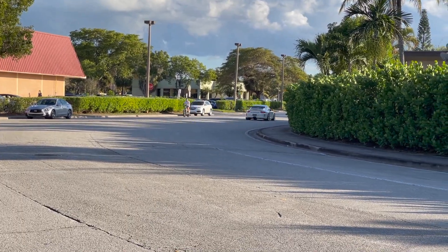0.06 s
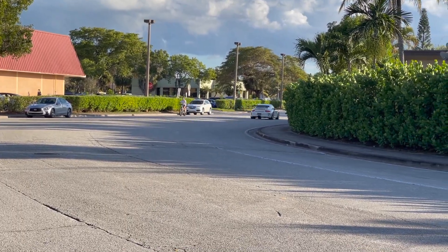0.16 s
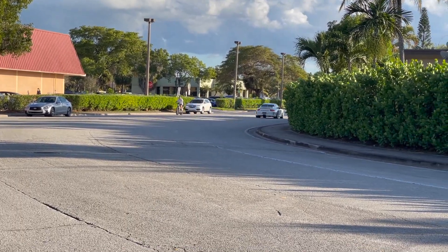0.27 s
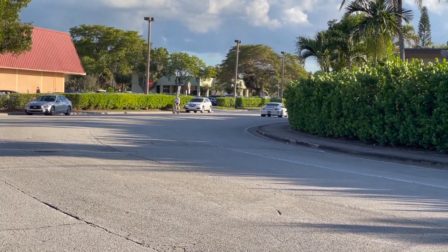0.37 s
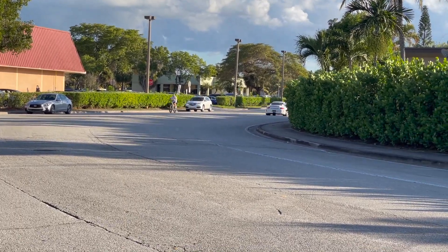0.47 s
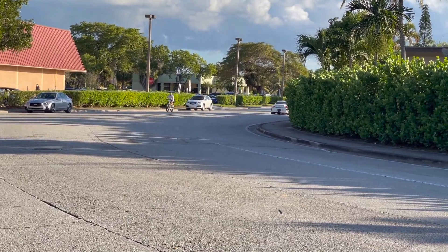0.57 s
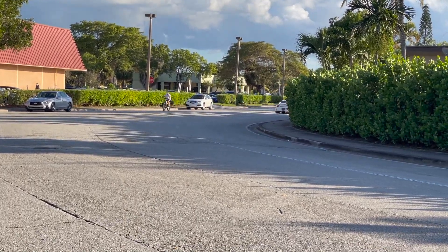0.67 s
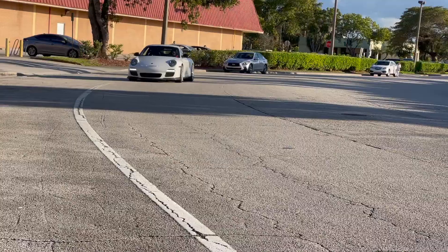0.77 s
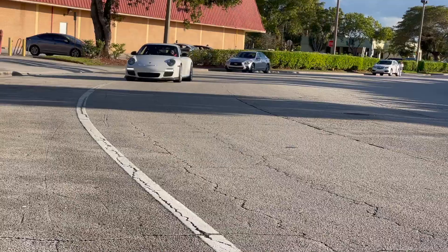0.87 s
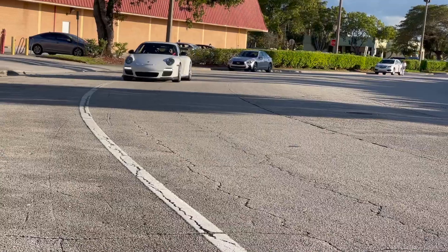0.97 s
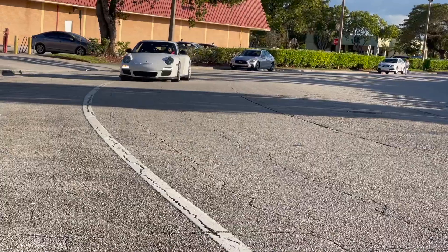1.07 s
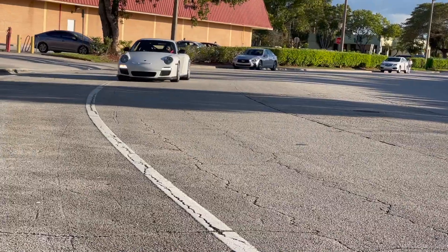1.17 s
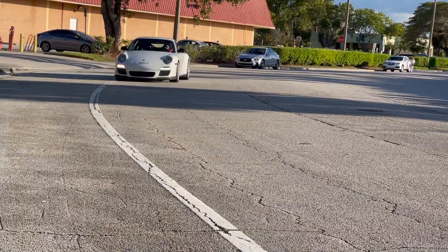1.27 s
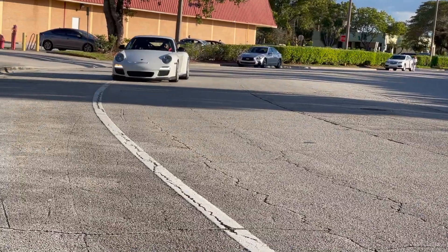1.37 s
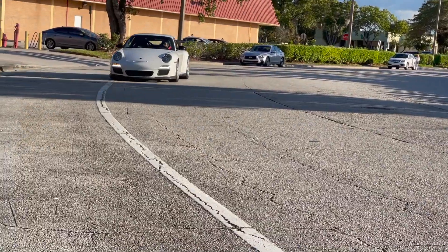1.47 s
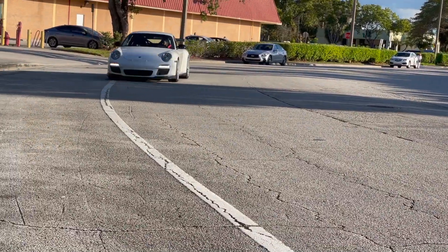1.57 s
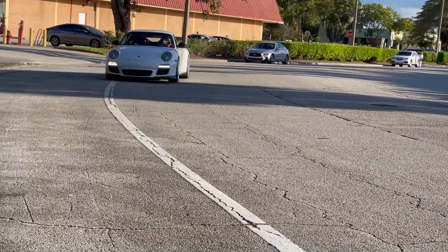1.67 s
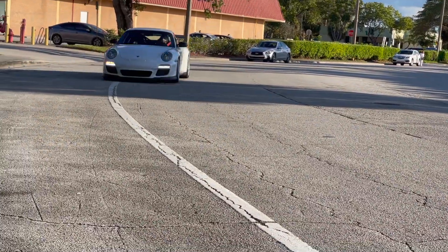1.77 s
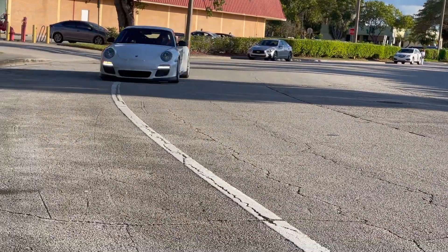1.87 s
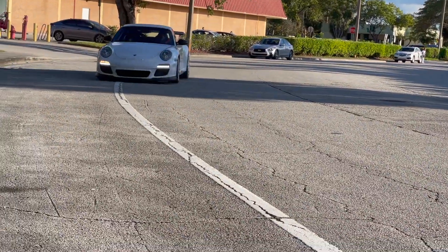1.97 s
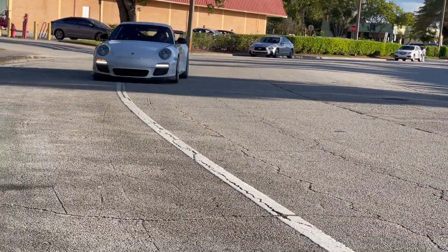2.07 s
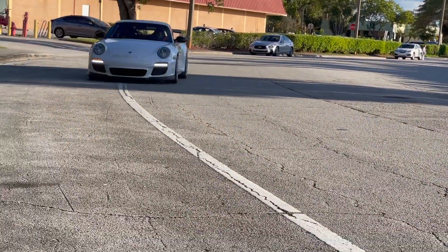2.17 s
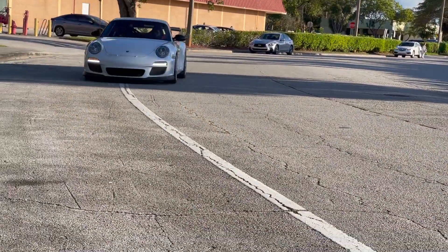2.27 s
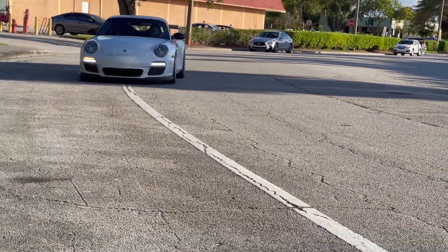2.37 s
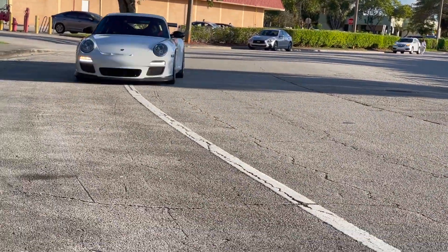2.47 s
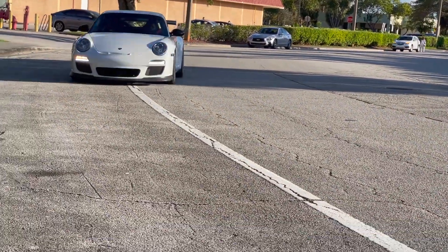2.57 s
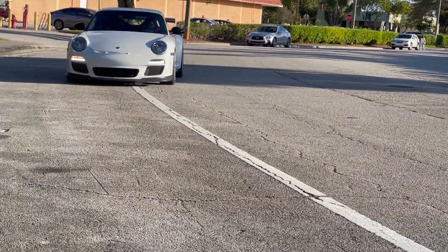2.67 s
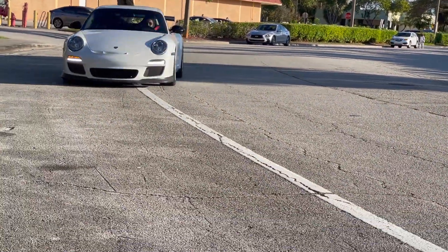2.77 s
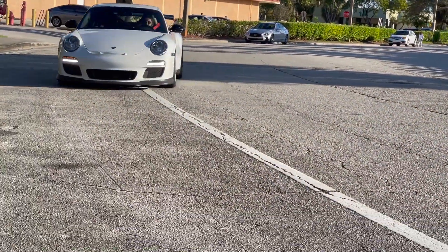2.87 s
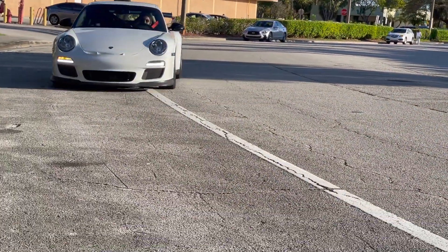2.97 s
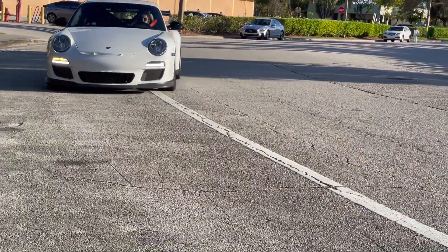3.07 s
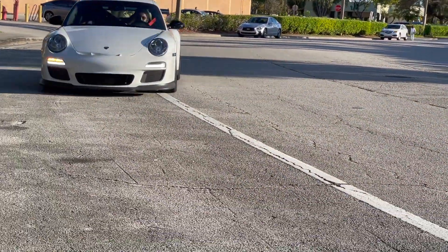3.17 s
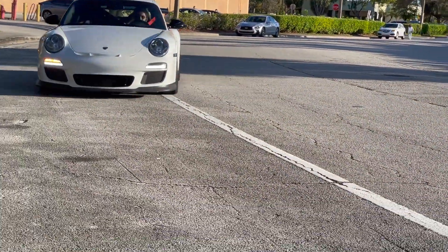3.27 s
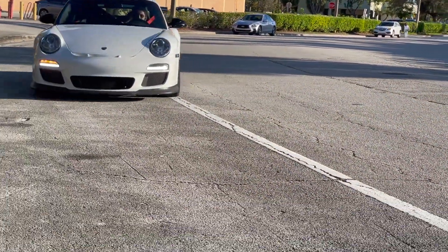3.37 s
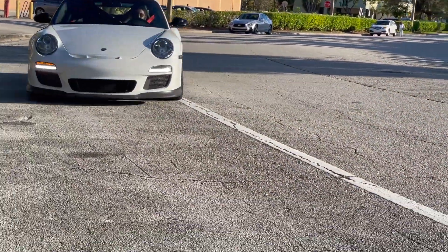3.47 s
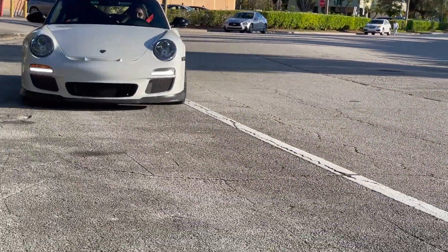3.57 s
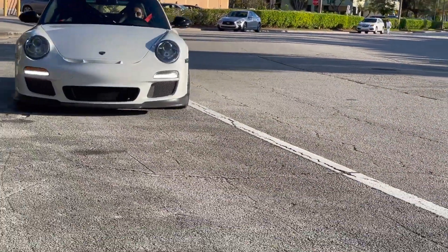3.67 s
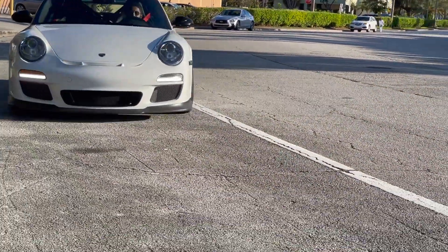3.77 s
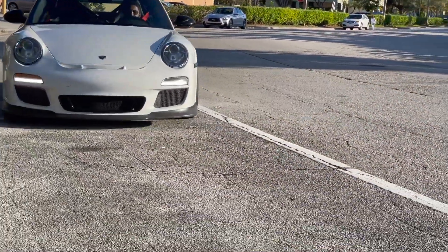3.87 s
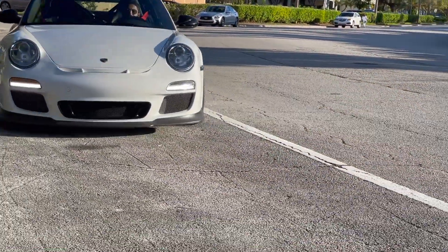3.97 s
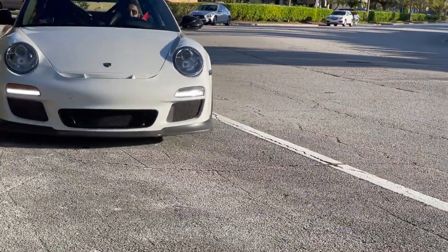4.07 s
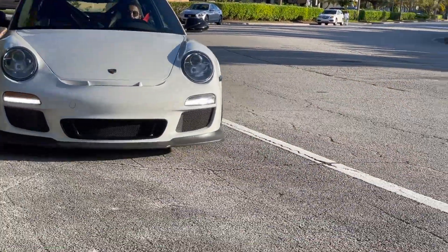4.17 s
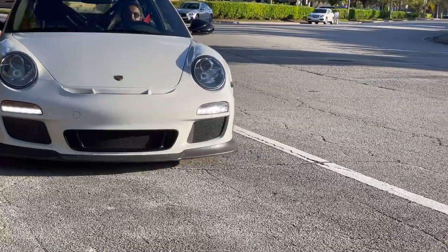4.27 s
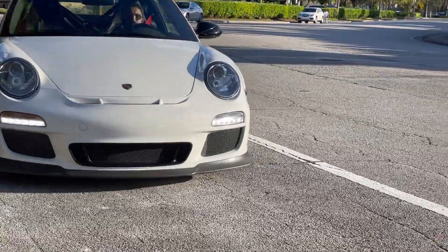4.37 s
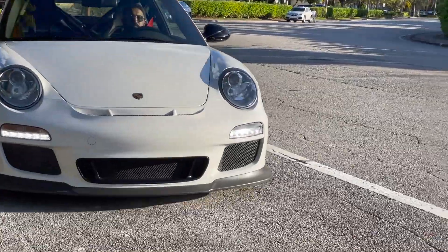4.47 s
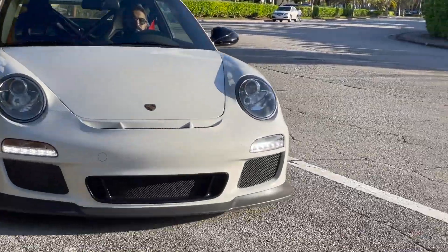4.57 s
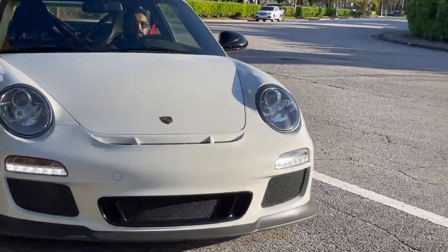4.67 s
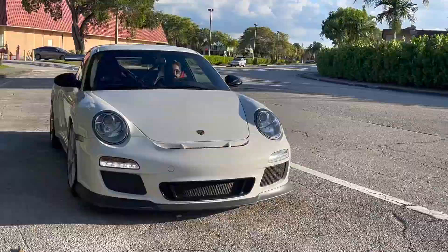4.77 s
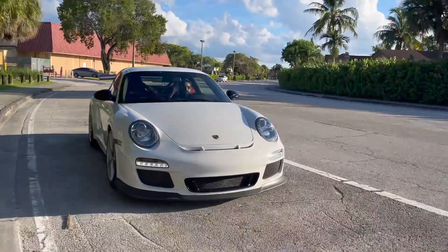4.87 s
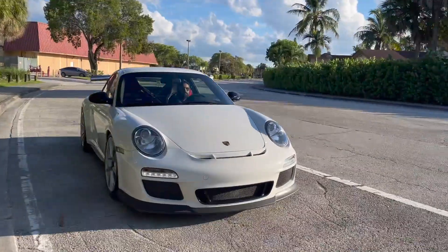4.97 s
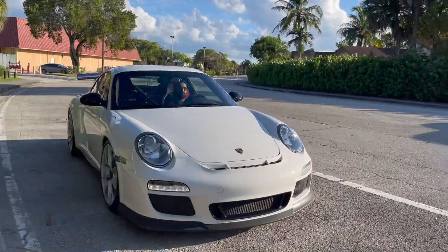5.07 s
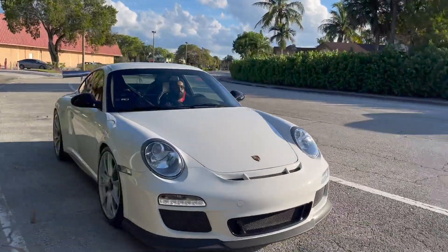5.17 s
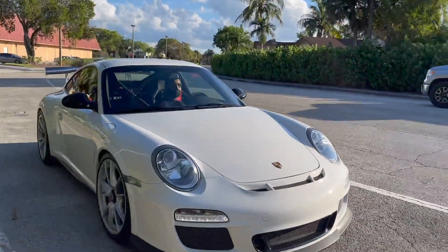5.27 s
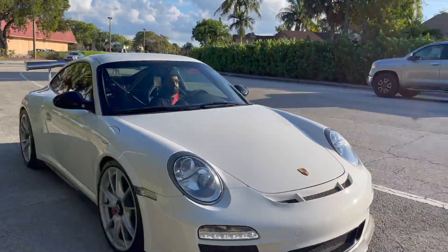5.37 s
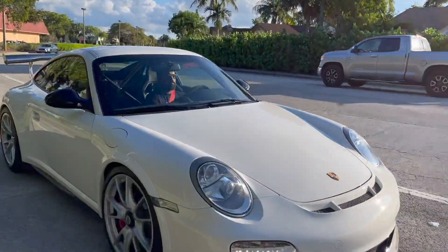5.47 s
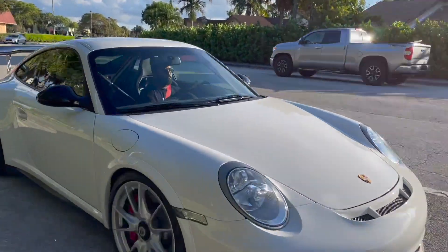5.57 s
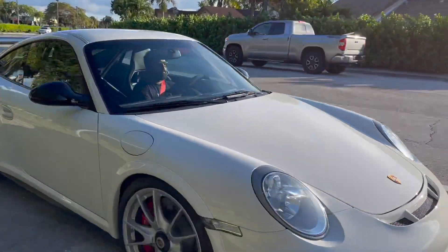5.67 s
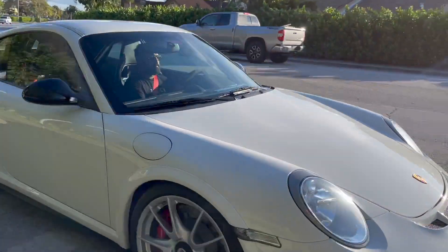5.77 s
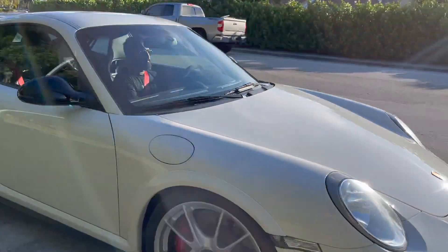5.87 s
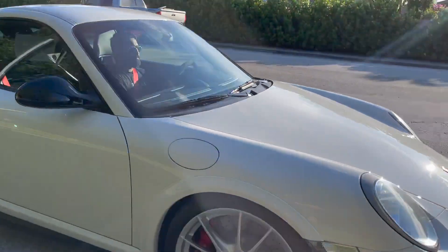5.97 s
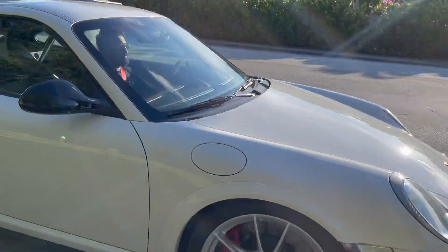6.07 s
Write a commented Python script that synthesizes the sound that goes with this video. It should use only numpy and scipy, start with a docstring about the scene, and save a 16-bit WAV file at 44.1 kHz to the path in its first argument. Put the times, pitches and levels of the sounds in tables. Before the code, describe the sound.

Sports car slowing on a suburban road: far pulsing hum, then a near exhaust growl falling to idle, with tyre hiss, pops and thin brake squeals.

```python
"""A flat-six sports car slows along a suburban road: first a brief far view, its engine a sagging, throbbing note.
After a short fade it is near: firing orders ring the exhaust while gas and tyres hiss as banded noise.
Grit ticks and dull exhaust pops are struck resonances; the brakes squeal in bursts, as chattering disc modes.
From 3.06 s fuel restores the overtones; a fan whine joins at 4.5 s, the stereo widens near 4.85 s,
and the car rolls past at idle."""
import sys
import numpy as np
from scipy import signal
from scipy.fft import rfft, irfft
from scipy.io import wavfile
from scipy.ndimage import uniform_filter1d

SR = 44100
rng = np.random.default_rng(int(sys.argv[2]) if len(sys.argv) > 2 else 0)


def master_out(mix):
    """Clip the mix to full scale and print it as 16-bit PCM to the path in sys.argv[1]."""
    frames = np.transpose(np.atleast_2d(mix))
    ceiling = np.clip(frames, -1, 1)
    pcm = np.round(ceiling * 32767).astype(np.int16)
    wavfile.write(sys.argv[1], SR, pcm)


N = 269451
T = np.arange(N) / SR  # s
HZ = np.maximum(np.fft.rfftfreq(N, 1 / SR), 1)
CUT_S, CUT_FADE_S = 0.769, 0.009  # far view gives way to near; fade on either side
WIDE_S = 4.85  # the stereo pickup widens here
LEFT_RIGHT = np.array([[1], [-1]])


def undb(db):
    """Logarithmic level: amplitude gain of a level in dB."""
    return 10 ** (np.asarray(db) / 20)


def unit(x):
    """Normalisation: scale to rms 1."""
    return x / x.std()


def columns(table):
    """Linear interpolation: each column at every sample, corners rounded over 10 ms."""
    s, *cols = np.transpose(table)
    return [uniform_filter1d(np.interp(T, s, c), size=441, mode="nearest") for c in cols]


def on_log(table, hz):
    """Logarithmic frequency scale: read (f, value) points between octaves evenly."""
    f, v = np.transpose(table)
    return np.interp(np.log(hz), np.log(f), v)


def walk(rate):
    """Low-passed randomness: levels held 1 / rate s and averaged twice, spread near 1."""
    k = int(SR / rate)
    steps = np.repeat(rng.standard_normal(N // k + 1), k)
    return 1.45 * uniform_filter1d(uniform_filter1d(steps, k), k)[:N]


def band(hz, octaves):
    """Band-limited noise: cosine-shaped spectrum, power in step with its width."""
    shape = np.cos(np.clip(np.log2(HZ / hz) / octaves, -1, 1) * np.pi / 2)
    return irfft(rfft(rng.standard_normal(N)) * shape, N)


# Engine orders before the pipe: t/s, firing rate f/Hz, first order level/dB, orders 2-3 level/dB,
# orders 4-6 level/dB against those, raggedness (0-1)
ENGINE_ORDERS = [(.78, 93.54, -22, -25, 2, .8), (1.0, 90.6, -18, -26.5, -1, 0.93),
                 (1.15, 89.2, -12, -16, -1, .3), (1.27, 88.08, -11.5, -31, 2, .05),
                 (1.42, 87.17, -16.5, -15.5, 1, 0.2), (1.6, 84.64, -21.5, -21, -1, 0),
                 (2.045, 78.81, -10.5, -19, -2, .1), (2.09, 77.6, -25, -23, -1, .95),
                 (2.18, 75.8, -30.5, -27, -1, .9), (2.26, 74.21, -19, -30, -1, 0.9),
                 (2.55, 69.27, -17, -32, -1, 0.6), (2.75, 65.63, -11.5, -30, -2, .6),
                 (3.04, 61.2, -20.5, -29, 8, 0.74), (3.17, 60.24, -17, -20, -0.5, 0.8),
                 (3.5, 57.59, -16.5, -18, 2, 0.8), (3.65, 56.19, -13, -16, -0.5, 0.4),
                 (4.0, 54.13, -13, -17, 3.5, 0.3), (4.18, 51.8, -11.5, -15, 3, 0.8),
                 (4.37, 44.7, -9.5, -13.5, -5.5, 0.8), (4.59, 40.53, -14.5, -15, -7.5, 0),
                 (4.8, 41.21, -9.5, -14.5, 0.5, 0), (5.0, 40.8, -13.5, -13, -11.5, 0.03),
                 (5.4, 40.2, -12.5, -13, -5.5, .05), (5.47, 39.28, -15, -13, -3.5, .08),
                 (5.8, 39.2, -11.5, -12, -3.3, 0.3), (6.11, 38.94, -12.5, -12, -0.5, 0.3)]
# Transmission of the exhaust pipe: f/Hz, level/dB
PIPE_RESPONSE = [(38, -25.5), (55, -4.5), (80, 0.57), (120, -.5), (155, -10.5), (172, -7.5), (200, -14),
                 (232, -11), (290, -32), (400, -38.5)]
# Exhaust resonances that delay the orders: f/Hz, Q
PIPE_RESONANCES = [(88, 10), (140, 6)]
FUEL_S, FUEL_RISE_S = 3.06, 0.13  # fuel returns, and takes hold over this time
COAST_FALL_DB = 4  # off fuel each overtone is that much weaker than the last
FLUTTER_DB, RAGGED_DB, WANDER_DB = 0.7, 4.5, 2.5  # steady; added when ragged off fuel; drift of orders 4-6


def exhaust():
    """Harmonic source and resonator: firing orders are coloured and phase-lagged by the pipe."""
    hz, first_db, over_db, upper_db, ragged = columns(ENGINE_ORDERS)
    coasting = 1 - np.clip((T - FUEL_S) / FUEL_RISE_S, 0, 1)
    firing_phase = 2 * np.pi * np.cumsum(hz * (1 + 0.0048 * walk(12))) / SR
    note = 0
    for k in range(1, 7):
        source_db = first_db if k == 1 else over_db - (k - 2) * COAST_FALL_DB * coasting
        db = on_log(PIPE_RESPONSE, k * hz) + source_db
        db = db + (FLUTTER_DB + RAGGED_DB * ragged * coasting) * walk(20)
        if k > 3:
            db = db + upper_db + WANDER_DB * walk(7)
        lag = 2.5
        for f, q in PIPE_RESONANCES:
            ratio = k * hz / f
            lag = lag + np.arctan2(ratio / q, 1 - ratio ** 2)
        phase = k * firing_phase - lag + 0.07 * k * walk(25)
        note = note + undb(db) * np.sqrt(2) * np.cos(phase)
    # the banks alternate: level patterns repeat every two and every three firings
    banks = 1 + 0.022 * np.cos(firing_phase / 2) + 0.067 * np.cos(firing_phase / 3)
    return note * banks, firing_phase, ragged


BURBLE_DB, BURBLE_TOP_DB = -21, -12  # rms when fully ragged, before flutter; upper band against lower


def burble(ragged):
    """Amplitude-modulated noise: two low bands swell with the raggedness of the firings."""
    level = ragged * undb(BURBLE_DB + 1.4 * walk(16))
    return level * (unit(band(79.0, 1.26)) + undb(BURBLE_TOP_DB) * unit(band(222, 0.58)))


DRONE_HZ, DRONE_SAG_HZ_S = 163, 8.1  # starting pitch and its fall per second
DRONE_DB = -19  # rms at the crest of a throb, before waver
THROB_HZ, THROB_PEAK_S, THROB_DB = 4.95, 0.012, 6.5  # rate, first crest, half of the full swing
RASP_DB, RASP_FADE_DB_S = (-28, -36), (33, 11)  # lower and upper band


def drone():
    """Amplitude and frequency modulation: the far engine's sagging note throbs with two bands of rasp."""
    throb_db = THROB_DB * (np.cos(2 * np.pi * THROB_HZ * (T - THROB_PEAK_S)) - 1)
    phase = 2 * np.pi * (DRONE_HZ - DRONE_SAG_HZ_S * T / 2) * T + 0.5 * walk(28.2)
    note = undb(DRONE_DB + throb_db + 1.7 * walk(22.3)) * np.sqrt(2) * np.cos(phase)
    low, high = (undb(db - fade * T + throb_db / 2) for db, fade in zip(RASP_DB, RASP_FADE_DB_S))
    return note + low * unit(band(636, 0.18)) + high * unit(band(804, 0.051))


# Brake squeals: onset t/s, length t/s, starting f/Hz, amplitude level/dB before chatter
BRAKE_SQUEALS = [(2.524, 0.13, 8850, -50.5), (2.595, 0.22, 5830, -51), (2.812, 0.06, 5880, -56),
                 (2.793, .14, 8750, -47.5), (2.837, .1, 6680, -59), (2.86, 0.15, 5830, -45),
                 (3.014, 0.045, 5780, -57), (4.603, 0.078, 5770, -41.5), (4.922, 0.1, 5800, -52),
                 (5.034, 0.055, 5780, -38.5), (5.489, .05, 6780, -50), (5.53, 0.044, 5800, -47.5),
                 (5.696, 0.075, 5770, -41), (6.062, .1, 5820, -36.5)]


def brakes():
    """Stick-slip friction: pads chatter on disc modes, each tone sagging in pitch as it swells and fades."""
    squeal = np.zeros(N)
    chatter, waver = undb(2.8 * walk(120)), 1.2 * walk(250)
    for s, length, hz, db in BRAKE_SQUEALS:
        swell = np.sin(np.pi * np.clip((T - s) / length, 0, 1)) ** 0.5
        phase = 2 * np.pi * hz * (T - 0.009 * (T - s) ** 2 / length)
        phase = phase + waver * (hz / 5800) ** 2  # higher modes wander more
        tone = np.cos(phase)
        if hz < 6000:
            tone = tone + undb(-17) * np.cos(2 * phase)  # faint octave
        squeal += undb(db) * swell * chatter * tone
    return squeal


def hits(table, ring_s, breadth):
    """Impulse excitation: a sharp blow with a short noisy tail drives a broad resonance."""
    out, t = np.zeros((2, N)), np.arange(2048) / SR
    burst = rng.standard_normal((len(table), 2048))
    for (s, db, hz, *pan_db), noise in zip(table, burst):
        edges = [hz / breadth, min(hz * breadth, 12300)]
        blow = (t == 0) * 3.7 + noise * np.exp(-t / ring_s)
        resonance = signal.butter(2, edges, "band", fs=SR, output="sos")
        tone = signal.sosfilt(resonance, blow)
        i = int(s * SR)
        gain = undb(db + LEFT_RIGHT * sum(pan_db) / 2)
        out[:, i:i + 2048] += gain * tone / abs(tone).max()
    return out


# Dull pops in the exhaust: t/s, peak level/dB, centre f/Hz, left minus right level/dB
EXHAUST_POPS = [(2.215, -24.5, 872, 4), (3.484, -19, 640, -0.5), (3.99, -25, 674.5, 1.5),
                (4.033, -18, 700, 7), (4.14, -18.5, 699, -3), (5.194, -29, 813, -5), (5.333, -28, 843, 6),
                (5.365, -23, 763, 8)]


def exhaust_pops():
    """Impulse response: pops excite resonances with band edges a factor 1.53 from the centre."""
    return hits(EXHAUST_POPS, 0.0006, 1.53)


# Grit cracking under the tyres: t/s, peak level/dB, centre f/Hz
GRIT_TICKS = [(1.4718, -30, 8700), (1.6771, -33, 8340), (1.6908, -40, 6430), (1.9054, -24, 11100),
              (2.0813, -32, 11100), (2.4503, -30, 6106), (2.9047, -27, 8655), (3.1356, -30, 7500),
              (3.2292, -32.5, 6820), (3.2836, -31, 6426), (3.2958, -30, 7772)]


def grit_ticks():
    """Impulse response: cracking grit excites a broader, brighter resonance."""
    return hits(GRIT_TICKS, 0.0006, 2.0)


# Cooling fan: t/s, f/Hz, rms level/dB before flutter
FAN_WHINE = [(4.5, 376.4, -44.5), (4.7, 379, -45), (5.6, 395.5, -39), (6.11, 412.8, -39.5)]


def fan_whine():
    """Rotating tonal source: one thin sinusoid of wavering phase and level."""
    hz, db = columns(FAN_WHINE)
    phase = 2 * np.pi * np.cumsum(hz) / SR + 0.83 * walk(26)
    sounding = T > FAN_WHINE[0][0]
    return undb(db + 3.12 * walk(12)) * sounding * np.sqrt(2) * np.cos(phase)


# Swells of coarse hiss: centre t/s, spread t/s, rms level/dB at the crest before flutter
HISS_SWELLS = [(4.65, 0.21, -51), (5.85, .3, -49.8)]


def coarse_hiss():
    """Narrow-band noise: Gaussian envelopes swell a hiss near 2.5 kHz."""
    swell = sum(undb(db) * np.exp(-((T - s) / spread) ** 2) for s, spread, db in HISS_SWELLS)
    return swell * undb(2.1 * walk(40)) * unit(band(2520, 0.2))


# Stereo width of the noise before narrowing: f/Hz, side minus mid level/dB
STEREO_WIDTH = [(60, -29), (110, -39.5), (200, -14.5), (350, -7.5), (630, -8.5), (1140, -5), (2000, -10.5)]
TOP_SIDE = 0.4  # share of the side signal kept above 10 kHz; none from 8 to 10 kHz


def road_noise(levels, colour, firing_phase, puff, narrow_db):
    """Filter-bank synthesis: third-octave noise bands flicker alone and puff once a firing, more so higher up."""
    out, wide = 0, np.clip((T - WIDE_S) / 0.059, 0, 1)
    for hz in 32 * 2 ** np.arange(0, 8.7, 1 / 3):
        # each band blends neighbouring rows of rumble, tyre roar, rasp, gas hiss and top hiss
        corners = np.log([280, 650, 1400, 3500, 8500, 12500])
        place = np.interp(np.log(hz), corners, [0, 1, 2, 3, 3, 4])
        share = np.clip(1 - abs(place - np.arange(len(levels))), 0, 1)
        gain = undb(on_log(colour, hz) + share @ levels + 0.36 * walk(10) + 0.78 * walk(70))
        gain = gain * (1 + puff * min(hz / 600, 1) * np.cos(firing_phase))
        mid = band(hz, 1 / 3)
        side = undb(on_log(STEREO_WIDTH, hz) - narrow_db) * band(hz, 1 / 3)
        if hz > 2300:  # the treble is narrow until the pickup widens
            side = side * (0.03 + 1.9 * wide)
            if hz >= 8000:
                side = side * TOP_SIDE * (hz > 10000)
        if 400 < hz < 8000:
            side = side + 0.22 * wide * mid  # the wide pickup finds the car to the left
        out = out + gain * (mid + side * LEFT_RIGHT)
    return out


# Spectrum of the far noise, reached at the cut: f/Hz, level/dB per Hz
FAR_SPECTRUM = [(18, -47), (30, -13.5), (155, 1), (215, -8.5), (322, -15), (436, -34), (575, -28.5),
                (636, -25), (798, -28.5), (883, -29.5), (1840, -30.5), (2490, -39.5), (8780, -56.5),
                (10200, -59), (12500, -76), (16200, -107), (22000, -120)]
# Decay rates up to the cut, in dB/s: rumble, tyre roar, rasp, gas hiss, top hiss
FAR_DECAY = [4.6, 11, 10.8, 3.1, 8]


def far_air(firing_phase):
    """Exponential decay: distant broad noise falls steadily in dB towards the cut."""
    levels = np.outer(FAR_DECAY, np.maximum(CUT_S - T, 0))
    return road_noise(levels, FAR_SPECTRUM, firing_phase, 0, 14.0)


# Echo off the road: t/s, delay in ms, strength (0-1)
ROAD_REFLECTION = [(.78, 1.14, 0), (3.4, 1.03, 0.12), (4.3, 1.135, 0.15), (4.7, 1.58, 0.23),
                   (5.2, 1.1, 0.04), (5.7, 0.63, 0.24), (6.11, 0.96, 0)]


def road_echo(x):
    """Comb filtering: a later copy off the road interferes, its delay moving with the car."""
    ms, strength = columns(ROAD_REFLECTION)
    late = np.arange(N) - ms * SR / 1000
    # rough asphalt scatters the treble
    dull = signal.sosfilt(signal.butter(2, 3000, fs=SR, output="sos"), x)
    return x + strength * np.array([np.interp(late, np.arange(N), c) for c in dull])


# Relative spectrum of the near noise: f/Hz, level/dB per Hz
NEAR_SPECTRUM = [(30, -30.5), (60, -6.5), (180, 0), (300, -9), (450, -14.5), (800, -15), (1300, -22.5),
                 (2200, -31.5), (4000, -39.5), (6500, -42.5), (8800, -40.5), (10500, -42.5), (11500, -44),
                 (12500, -81)]
# Added level as the car closes in: t/s, tyre roar level/dB, rasp level/dB, gas hiss level/dB
CLOSING_IN = [(.78, -3.5, 1.5, -2), (1.5, -5, -2.5, -5), (2.5, -2, -1.3, -3), (3.3, -1.8, -1.5, -1.5),
              (4.1, 3, 0.8, 1.2), (4.55, 3, -1.5, 4), (5.3, 6, 3.5, 6), (5.7, 8, 6, 7.5),
              (6.11, 3, 4.5, 10)]
RUMBLE_SHARE, TOP_SHARE = 0.53, 1.2  # dB of rumble per dB of roar, dB of top hiss per dB of gas hiss
TOP_DB, TOP_WIDE_DB = -9, 10.5  # top hiss, and its rise as the pickup is about to widen


def near_air(firing_phase):
    """Direct and reflected sound: approaching tyre and gas noise is combed by the road echo."""
    roar, rasp, hiss = columns(CLOSING_IN)
    opening = np.clip((T - WIDE_S) / 0.15 + 1, 0, 1)  # complete at WIDE_S
    top = TOP_DB + TOP_SHARE * hiss + TOP_WIDE_DB * opening
    levels = np.array([RUMBLE_SHARE * roar, roar, rasp, hiss, top])
    return undb(-5.5) * road_echo(road_noise(levels, NEAR_SPECTRUM, firing_phase, 0.032, 0.1))


# Stereo balance of the near car apart from the brakes: f/Hz, left minus right level/dB
STEREO_LEAN = [(60, 0), (110, 2), (200, 5.5), (350, 1.5), (630, 0.5), (1140, 1), (2060, 0.5), (3720, 0),
               (6710, 3.5), (12100, -1.5)]


def scene():
    """Superposition: the far view, a cut through a short fade, then the near view, with hits on top."""
    pipe, firing_phase, ragged = exhaust()
    far = drone() * undb(0.4 * LEFT_RIGHT) + far_air(firing_phase)
    engine = pipe + burble(ragged) + fan_whine() + coarse_hiss()
    lean = undb(0.5 * LEFT_RIGHT * on_log(STEREO_LEAN, HZ))
    near = irfft(rfft(engine + near_air(firing_phase)) * lean, N)
    near += brakes() * undb(LEFT_RIGHT * 5.5 * (T > WIDE_S))  # squeals move left
    fade = np.clip(abs(T - CUT_S) / CUT_FADE_S, 0, 1)
    return np.where(T < CUT_S, far, near) * fade + grit_ticks() + exhaust_pops()


# Phase between the ports before the treble drift: f/Hz, radians that the right port trails
PORT_PHASE = [(30, 0.21), (260, 0.25), (700, -0.37), (2000, 0.2), (8700, -0.17)]
TOP_HZ = 12700  # upper limit of the pickup


def record(dry):
    """Saturation and interaural-style phase: peaks are rounded, the right port shifts, the top is cut."""
    # the two ports drift one full cycle apart across this treble band
    drift = np.interp(HZ, [8750, 11840], [0, 2 * np.pi])
    phase = drift - on_log(PORT_PHASE, HZ)
    dry = np.tanh(0.66 * dry) / 0.7
    ports = np.array([dry[0], irfft(rfft(dry[1]) * np.exp(1j * phase), N)])
    return signal.sosfilt(signal.ellip(8, 0.2, 70, TOP_HZ, fs=SR, output="sos"), ports)


dry = scene()
out = record(dry)
master_out(out)
```